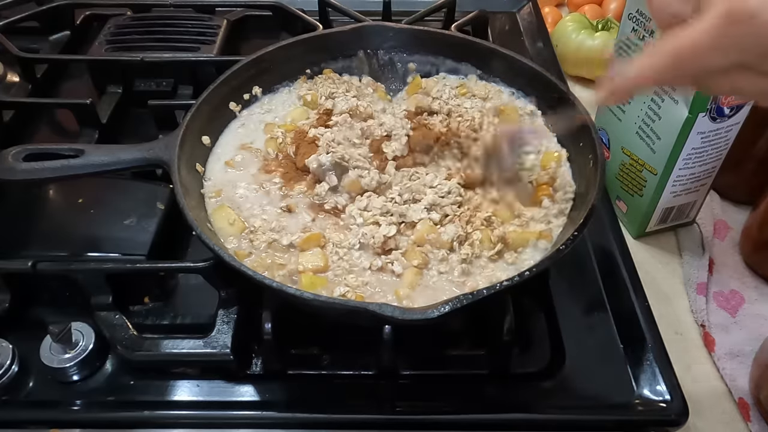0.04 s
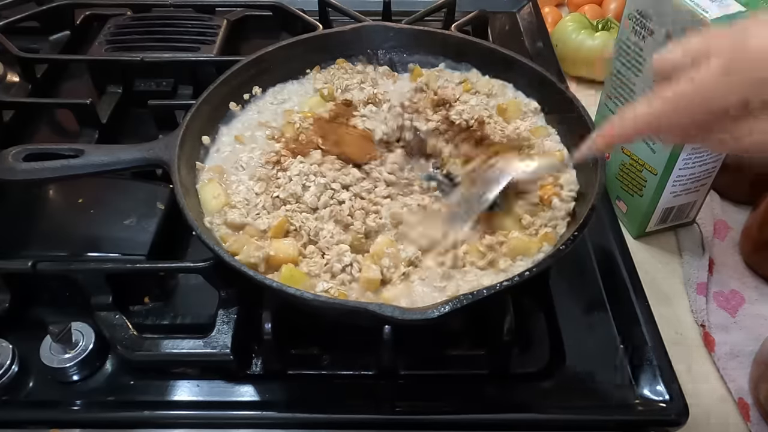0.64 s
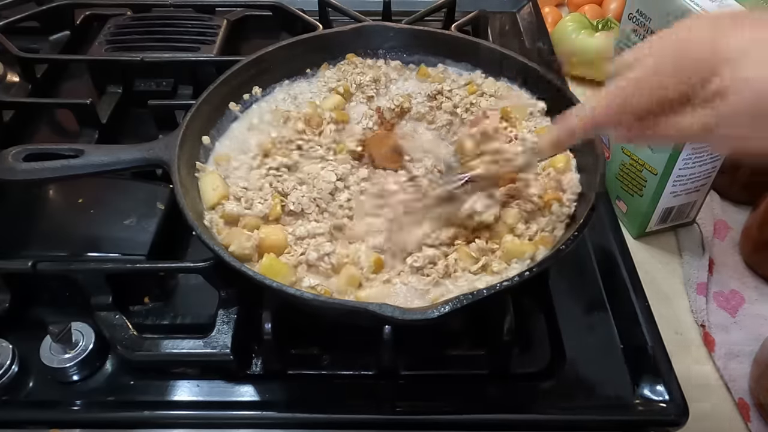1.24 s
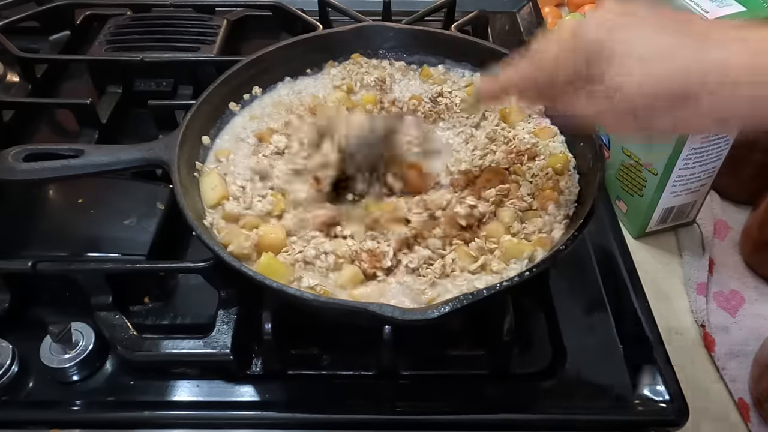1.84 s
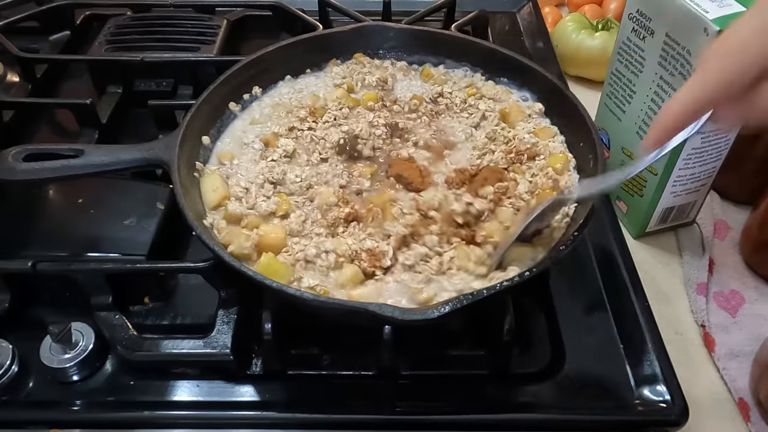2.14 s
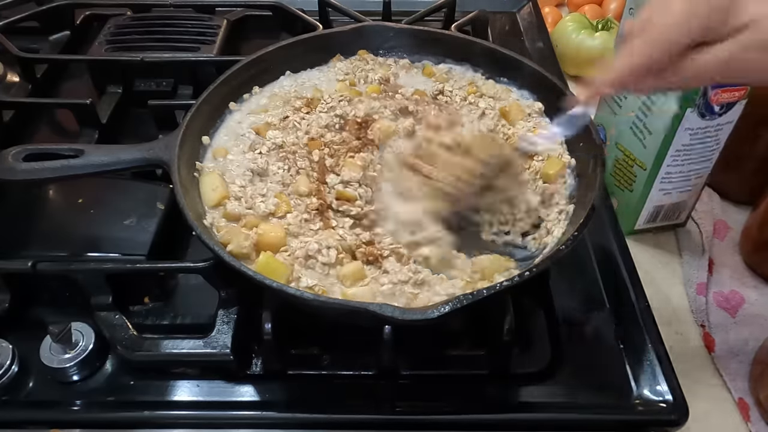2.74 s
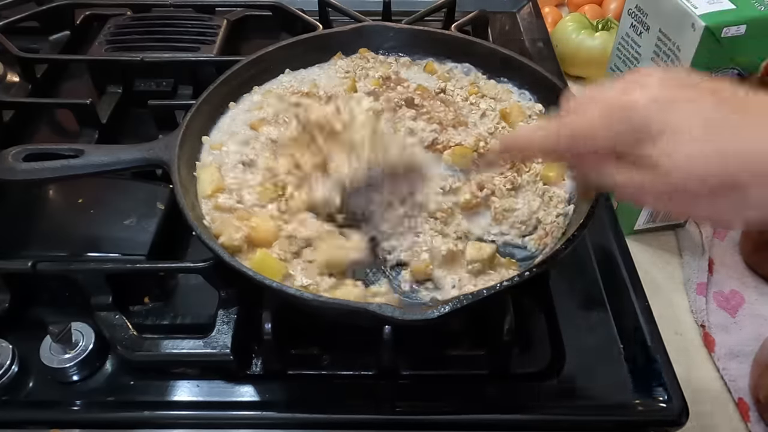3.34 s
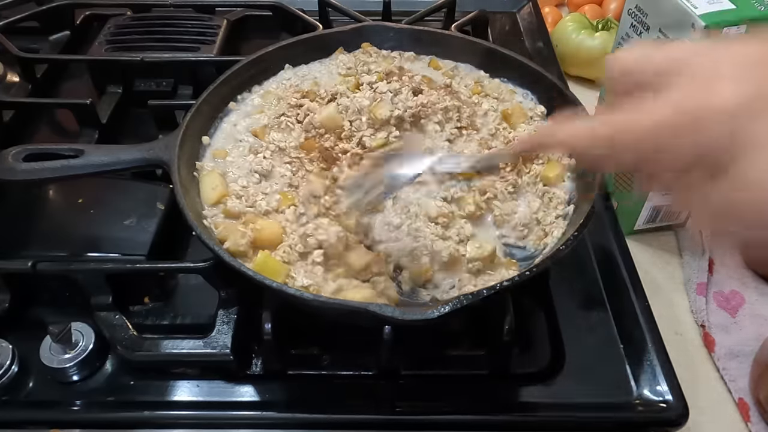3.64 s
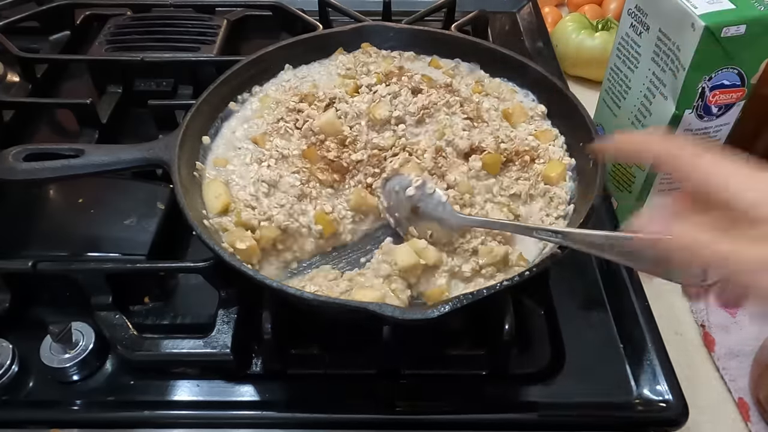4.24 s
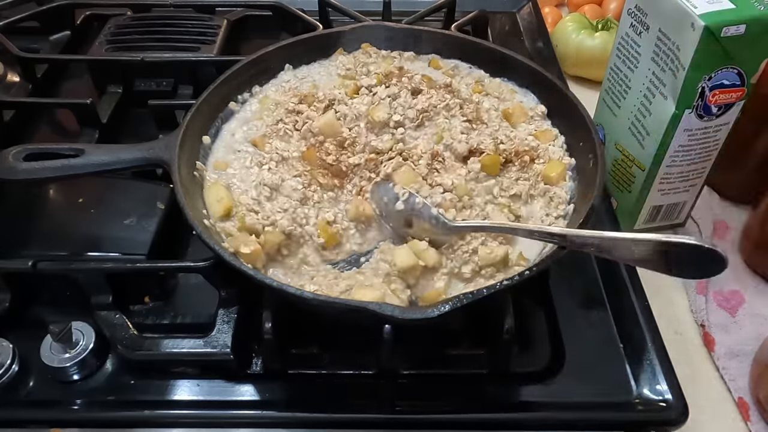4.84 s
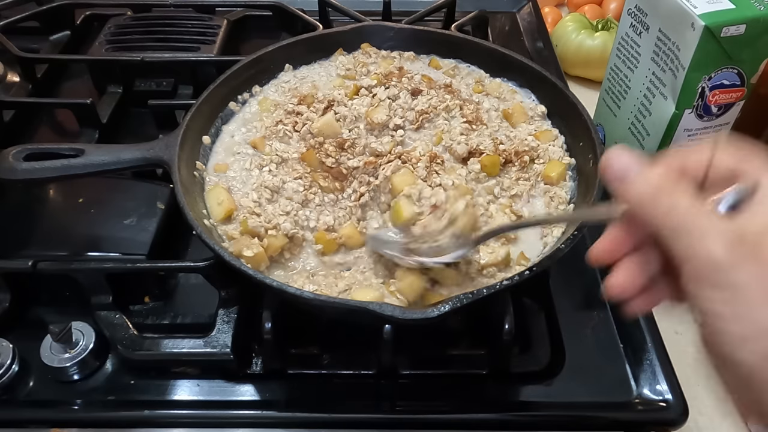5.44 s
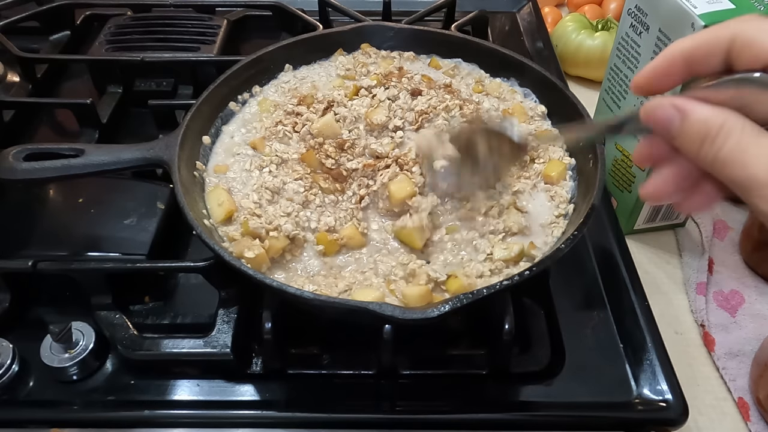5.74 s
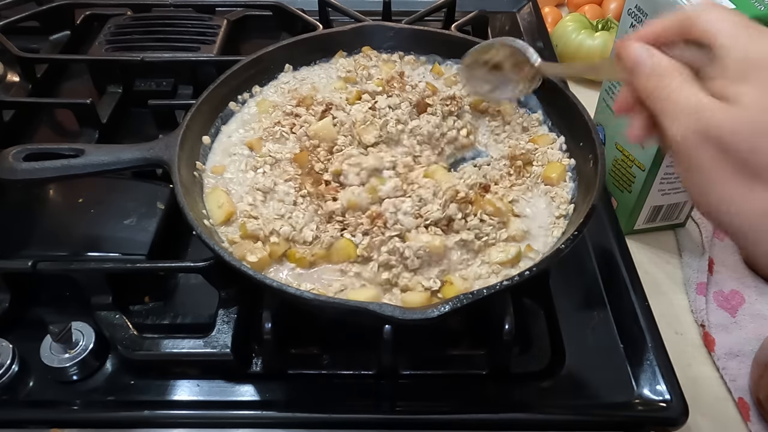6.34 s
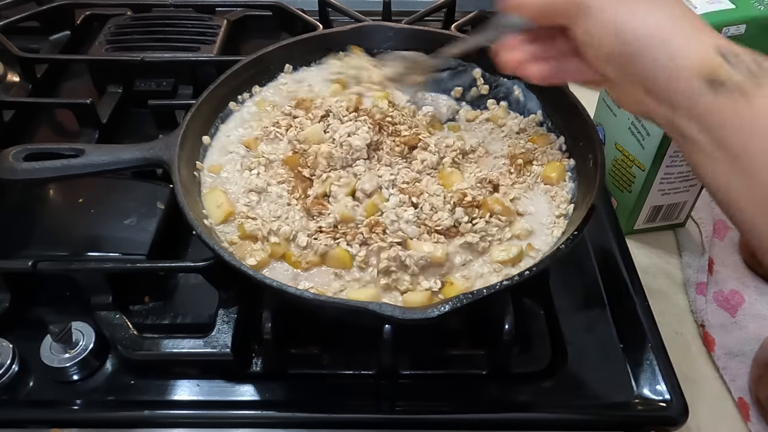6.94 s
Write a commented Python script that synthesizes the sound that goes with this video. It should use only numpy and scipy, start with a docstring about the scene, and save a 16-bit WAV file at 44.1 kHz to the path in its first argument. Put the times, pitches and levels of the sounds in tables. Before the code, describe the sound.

A steel spoon stirs thick oatmeal in a cast iron skillet, heard close in a small kitchen over a faint low rumble and hiss. From about 0.2 seconds, short gritty scrapes and damped clinks come roughly every half second, with soft wet squelches beneath and a sticky tick at 1.6 seconds. From about 1.9 seconds the pan also thuds dully on its grate. The loudest clink lands at 3.2 seconds and rings briefly. Around 4 seconds, sharp clinks run into a hard, chattering scrape, followed by a knock and a lighter tap near 4.3 seconds and a faint one at 4.6. Then only quiet bubbling and tiny pops remain. From about 5.8 seconds, soft squelches and wet ticks return, with a clear clink and short scrape at 6.6 seconds and a soft thud near 7 seconds.

```python
"""A steel spoon scrapes and clinks on a cast iron skillet as it stirs thick oatmeal in a small kitchen.
Stick-slip friction makes the rim grind, snag and chatter; impacts excite the modes of spoon and pan,
and the porridge damps them. The pan thuds on its grate. Wet oats squelch at each fold and tick as
films and bubbles burst. All is heard close by, in stereo, over a low rumble and a soft hiss."""
import sys
import numpy as np
from scipy import signal
from scipy.fft import rfft, irfft, next_fast_len
from scipy.io import wavfile
from scipy.ndimage import uniform_filter1d, map_coordinates

SR = 44100
rng = np.random.default_rng(int(sys.argv[2]) if len(sys.argv) > 2 else 0)


def to_wav(sig):
    """Store sig (one row per channel, or 1-D mono) as 16-bit WAV at the path in sys.argv[1].

    Samples outside -1..1 are clipped; the rate is SR.
    """
    pcm = np.clip(np.atleast_2d(sig), -1, 1) * 32767
    pcm = np.round(pcm).astype(np.int16)
    wavfile.write(sys.argv[1], SR, pcm.T)  # frames by channels


N = 308259


def amp(db):
    """Amplitude ratio of a level in decibels."""
    return 10 ** (np.asarray(db) / 20)

def unit(x):
    """Normalisation to rms 1."""
    return x / np.sqrt(np.mean(x ** 2) + 1e-20)

def along(points, hz):
    """Interpolation of (f/Hz, value) points on a logarithmic frequency axis."""
    f, values = np.transpose(points)
    return np.interp(np.log(hz + 1), np.log(f + 1), values)

def seconds(size):
    """Sample times, t/s."""
    return np.arange(size) / SR

def fade(t, t60):
    """Exponential decay, 60 dB in t60."""
    return np.exp(-np.log(1000) * t / t60)

def bell(x):
    """Gaussian curve of height 1."""
    return np.exp(-.5 * x ** 2)

def below(hz, edge_hz):
    """Gain of a steep low-pass filter."""
    return 1 / (1 + (hz / edge_hz) ** 8)

def add(track, start, sound):
    """Superposition of a sound on a track, from start in seconds."""
    part = track[round(start * SR):][:len(sound)]
    part += sound[:len(part)]

def filtered(x, response):
    """Linear filtering: the spectrum of x times a frequency response."""
    size = next_fast_len(x.shape[-1] + SR // 4)
    return irfft(rfft(x, size) * response(np.fft.rfftfreq(size, 1 / SR)), size)[..., :x.shape[-1]]

def coloured(x, spectrum, tilt_db=0, knee_hz=2500, size=2048):
    """Minimum-phase filtering to a spectrum, tilted by tilt_db per octave above the knee."""
    hz = np.fft.rfftfreq(size, 1 / SR)
    gain = amp(along(spectrum, hz) + tilt_db * np.log2(np.hypot(1, hz / knee_hz)))
    cepstrum = irfft(np.log(gain + 1e-6))
    causal = 2 * cepstrum[:size // 2] * (np.arange(size // 2) > 0)
    pulse = irfft(np.exp(rfft(causal, size)))
    return signal.fftconvolve(x, pulse)[:len(x)]

def impulses(rate, spread_db):
    """Poisson process: rate impulses a second, of random sign and log-normal size."""
    occurs = rng.random(N) < rate / SR
    return occurs * rng.choice([-1, 1], N) * amp(spread_db * rng.standard_normal(N))

def wobble(rate):
    """Smooth random modulation, rate knots a second."""
    return map_coordinates(rng.standard_normal(int(N * rate / SR) + 2), [seconds(N) * rate])

def pressure(start, swell, hold, release, touch_db=-6.5, touch_s=0.0072):
    """Normal force, 0 to 1: the spoon lands lightly, bears down, holds and lets go."""
    t = seconds(N) - start
    landing = np.clip(1 + t / touch_s, 0, 1)
    bearing = amp(touch_db * np.clip(1 - t / swell, 0, 1))
    return landing * bearing * fade(np.maximum(t - swell - hold, 0), release)


# Spectral densities of the ambient rumble and hiss: f/Hz, level/dB
RUMBLE_SPECTRUM = [(22, -7.5), (65, -8.5), (85, -17), (102, -8.5), (167, -0.5), (248, -0.5), (350, -14.5),
                   (413, -11), (445, -13), (800, -22.5), (1150, -110)]
HISS_SPECTRUM = [(410, 2), (961, 2.5), (1300, 8.5), (1860, -5), (2860, -4), (4350, -19), (5320, -27.5),
                 (7040, -23.5), (12100, -47), (14500, -64)]
def background(rumble_db=-56.5, hiss_db=-61.5):
    """Stationary noise: a rumble nearly coherent between the channels, and a wider hiss."""
    def noise(spectrum, width):
        mid, side = filtered(rng.standard_normal((2, N)), lambda hz: amp(along(spectrum, hz)))
        return unit(np.array([mid + width * side, mid - width * side]))
    rumble = amp(rumble_db) * noise(RUMBLE_SPECTRUM, width=0.12)
    return rumble + amp(hiss_db) * noise(HISS_SPECTRUM, width=0.56)

# Reverberation time of the kitchen: f/Hz, T60/s
REVERB_TIMES = [(120, 0.38), (400, 0.46), (1500, 0.26), (4000, 0.15), (12000, 0.11)]
def reverberation(x, coherent_below_hz=520, build_s=0.0024):
    """Diffuse field: an exponential tail whose two channels are alike only in the bass."""
    hz, t, noise = signal.stft(rng.standard_normal((2, SR // 2)), SR, nperseg=256)
    mid, side = noise * fade(t, along(REVERB_TIMES, hz)[:, None]) * (1 - np.exp(-t / build_s))
    side = side * (hz ** 2 / (hz ** 2 + coherent_below_hz ** 2))[:, None]
    tail = signal.istft(np.array([mid + side, mid - side]), SR, nperseg=256)[1]
    return signal.fftconvolve(x[None], tail / np.linalg.norm(tail[0]), axes=1)[:, :N]

# Folds of the oats, clear of the iron: centre t/s, half-width/s, crackle/dB, mush/dB, froth/dB
OAT_FOLDS = [(0.037, 0.087, -64, -57, -72), (0.696, 0.17, -63, -64, -75.5),
             (1.554, 0.14, -65, -59.5, -69.5), (2.562, 0.13, -82, -63, -71.5),
             (3.519, 0.45, -69.5, -81, -69), (4.693, 0.57, -66.5, -65, -69),
             (5.78, 0.16, -71, -65.5, -72.5), (6.06, 0.038, -65, -57, -80), (6.254, 0.046, -68, -53, -92),
             (6.38, 0.12, -73, -62, -64.5), (6.593, 0.02, -65, -49, -85), (6.98, 0.021, -68, -52.5, -76)]
# Spectral density of sliding porridge: f/Hz, level/dB
MUSH_SPECTRUM = [(120, 9), (300, 28.5), (600, -2), (1300, 16), (2800, 8), (4100, 7), (5200, -18),
                 (7000, -20), (13000, -24)]
def mush():
    """Viscous shear: porridge slides over the spoon's bowl, a dense, soft smear at each fold."""
    t = seconds(N)
    slide = sum(amp(db) * bell((t - centre) / half) for centre, half, _, db, _ in OAT_FOLDS)
    return slide * unit(coloured(impulses(rate=5000, spread_db=3), MUSH_SPECTRUM))

# Spectral density of milk froth: f/Hz, level/dB
FROTH_SPECTRUM = [(2000, -55), (5000, -12.5), (7000, 4.5), (8500, -4.5), (10500, -3.5), (14000, -18)]
def froth(squeezed_db=-63):
    """Shot noise of fine bubbles: the milk sizzles under each stroke and at each fold."""
    t = seconds(N)
    push = np.max([pressure(*stroke[:4]) for stroke in SPOON_STROKES], axis=0)
    folds = sum(amp(db) * bell((t - centre) / half) for centre, half, _, _, db in OAT_FOLDS)
    sizzle = unit(coloured(impulses(rate=4000, spread_db=4), FROTH_SPECTRUM))
    return (amp(squeezed_db) * np.sqrt(push) + folds) * sizzle

# Spectral density of wet crackle: f/Hz, level/dB
CRACKLE_SPECTRUM = [(500, 0.5), (1400, 5), (3000, 2.5), (4200, 1), (5200, -13.5), (7000, -2.5),
                    (11000, -15), (14000, -24)]
def crackle(simmer_db=-65, clump_db=2):
    """Incoherent sources add in power: tiny bubbles burst in a low simmer that swells at each fold."""
    t = seconds(N)
    bursts = np.tanh(impulses(rate=700, spread_db=1.5) / 10)  # bubble size is limited
    fold_power = sum(amp(db) ** 2 * np.exp(-((t - centre) / half) ** 2)
                     for centre, half, db, _, _ in OAT_FOLDS)
    strength = np.sqrt(amp(simmer_db) ** 2 + fold_power) * amp(clump_db * wobble(rate=14))
    return strength * unit(coloured(bursts, CRACKLE_SPECTRUM))

# The loudest wet ticks: t/s, level/dB, f/Hz
WET_TICKS = [(1.595, -30, 2900), (5.958, -43, 3200), (5.9826, -40.5, 4280), (6.185, -40, 3200),
             (6.3313, -38, 4500), (6.511, -37, 4670), (6.876, -42, 6350), (6.9537, -37.5, 3870)]
def ticks(pop_count=45, pop_db=-47, pop_hz=6500, t60=0.026, gain_db=-9):
    """Film rupture: sticky milk tears in short noise bursts, loud ticks among faint random pops."""
    out, t = np.zeros(N), seconds(SR // 25)
    pop_times = rng.random(pop_count) * N / SR
    pops = [(start, pop_db + 3 * np.tanh(size), pop_hz * 2 ** (0.62 * height))
            for start, (size, height) in zip(pop_times, rng.standard_normal((pop_count, 2)))]
    for start, db, pitch in WET_TICKS + pops:
        band = lambda hz: amp(along(CRACKLE_SPECTRUM, hz)) * bell(np.log2((hz + 1) / pitch))
        smack = unit(filtered(rng.standard_normal(len(t)), band))
        add(out, start, amp(db + gain_db) * smack * fade(t, t60))
    return out

# Normal modes of the skillet on its grate: f/Hz, level/dB, T60/s
PAN_MODES = [(139.7, 4, 0.27), (246.4, -16, 0.44), (330, 5, 0.15), (460, 1.5, 0.16), (612.5, 1, 0.23),
             (752.5, -3, 0.18), (950, -3.5, 0.37), (1239, 3, 0.21), (1390, -8, 0.16), (1790, -5, 0.22),
             (1994, -15.5, 0.066), (2870, -8, 0.18), (3140, -7.5, 0.38), (3610, 1, 0.12),
             (4340, -13.5, 0.34), (7670, -34, 0.068)]
def pan_ring(weight, vary_db=4.0, detune=0.0123, smear_hz=9):
    """Modal superposition: one blow excites each damped mode of the pan by weight(f)."""
    t = seconds(SR // 2)
    hz, db, t60 = np.transpose(PAN_MODES)[:, :, None]
    # the shifting load of porridge detunes each mode and blurs its pitch
    hz = hz * np.exp(detune * rng.standard_normal(hz.shape))
    drift_step = np.sqrt(smear_hz * hz / hz.mean() / (2 * np.pi * SR))
    drift = drift_step * np.cumsum(rng.standard_normal((len(hz), len(t))), axis=1)
    gain = amp(db + vary_db * rng.standard_normal(hz.shape)) * weight(hz)
    cycles = hz * t + drift + rng.random(hz.shape)
    return np.sum(gain * np.sin(2 * np.pi * cycles) * fade(t, t60), axis=0)

# Dull blows of the pan on its grate and of dropped oats: t/s, level/dB, centre f/Hz
SOFT_BLOWS = [(1.37, -42, 228), (1.862, -32, 324), (2.316, -42.5, 400), (2.372, -27.5, 360),
              (2.402, -31.5, 125), (2.712, -32, 175), (2.713, -39, 740), (2.822, -33.5, 380),
              (2.822, -36.5, 576), (3.225, -31.5, 173), (3.232, -28, 312), (3.262, -28, 123),
              (3.919, -39, 483), (4.246, -31, 372), (4.249, -32.5, 159), (6.241, -49, 292),
              (6.291, -46, 227), (6.624, -41.5, 164), (6.631, -36.5, 360), (6.956, -39, 198)]
def thuds(octaves=0.4, rise_s=0.0045, lowest_hz=110, gain_db=-13.5, rock_db=-5, rock_cycles=14,
          rattle_db=-1.5, rattle_t60=0.36, stove_hz=62, stove_db=-9, stove_t60=0.53):
    """Soft impacts excite only low modes; the deeper the blow, the more it shakes the stove top."""
    out, t = np.zeros(N), seconds(SR // 2)
    high_pass = signal.butter(2, lowest_hz, "high", fs=SR, output="sos")
    onset = 1 - np.exp(-t / rise_s)
    for start, db, centre in SOFT_BLOWS:
        band = lambda hz: bell(np.log2((hz + 1) / centre) / octaves) * (1 - below(hz, lowest_hz))
        depth = lowest_hz / centre
        rattle = unit(filtered(rng.standard_normal(len(t)), band) * fade(t, rattle_t60 * depth ** .5))
        stove = unit(np.sin(2 * np.pi * stove_hz * t) * fade(t, stove_t60)) * depth ** 2
        # the pan rocks on the grate at a pitch set by where it is pushed
        rock = unit(np.sin(2 * np.pi * centre * t) * fade(t, rock_cycles / centre))
        blow = (unit(pan_ring(band)) + amp(rock_db) * rock + amp(rattle_db) * rattle) * onset
        add(out, start, amp(db + gain_db) * (signal.sosfilt(high_pass, blow) + amp(stove_db) * stove))
    return out

# Normal modes of the spoon's steel bowl: f/Hz, level/dB
SPOON_MODES = [(1210, 4), (1500, -1), (1900, 5.5), (2330, 1.5), (2920, 7.5), (4150, 4.5)]
def spoon_ring(contact_hz=2100, t60=0.008, octaves=0.38, vary_db=7.0, band_hz=(950, 4900)):
    """Damped vibration of the bowl, peak 1: modes near the contact frequency respond the most."""
    t = seconds(SR // 8)
    hz, db = np.transpose(SPOON_MODES)[:, :, None]
    distance = np.log2(hz / contact_hz) / octaves
    gain = amp(db + vary_db * rng.standard_normal(hz.shape)) / (1 + distance ** 2)
    ring = np.sum(gain * np.sin(2 * np.pi * hz * t), axis=0) * fade(t, t60)
    ring = signal.sosfilt(signal.butter(3, band_hz, "band", fs=SR, output="sos"), ring)
    return ring / np.abs(ring).max()

# The spoon left free after the hardest blow: t/s, initial level/dB, f/Hz, T60/s
FREE_RINGS = [(3.224, -43, 3070, 0.58)]
def singing(relative_width=0.09):
    """Free vibration: the spoon sings on in a narrow, blurred band that outlasts the blow."""
    out, t = np.zeros(N), seconds(SR // 2)
    for start, db, hz, t60 in FREE_RINGS:
        ring = unit(filtered(rng.standard_normal(len(t)), lambda f: below(f - hz, relative_width * hz)))
        add(out, start, amp(db) * ring * fade(t, t60))
    return out

# Spectral density of a bare contact: f/Hz, level/dB
CONTACT_SPECTRUM = [(60, -73), (130, -12), (300, -31), (700, -49), (1200, -13), (2700, 3.5), (4200, -2.5),
                    (5200, -8), (6800, 0.5), (9500, -15.5), (14000, -45)]
# The spoon lands on iron: t/s, level/dB, contact f/Hz, hardness/(dB/octave), pan ring/dB, spoon T60/s
SPOON_IMPACTS = [(0.192, -14.5, 1770, -39, -26.5, 0.016), (1.0853, -12, 1660, -17, -28, 0.011),
                 (1.4874, -18.5, 1310, -13.5, -25.5, 0.021), (1.5618, -32.5, 1600, -40, -38, 0.017),
                 (1.8603, -16, 1770, -34, -31, 0.015), (2.3139, -17.5, 2100, -22, -36, 0.012),
                 (2.7118, -13.5, 1990, -2.5, -25.5, 0.029), (2.8011, -19.5, 2330, -10.5, -36, 0.028),
                 (3.2251, -2, 2950, -2.5, -36, .019), (3.241, -16.5, 2630, -7, -26, 0.0093),
                 (3.917, -28.5, 1210, 8, -31, 0.016), (3.975, -9, 2440, 0, -23, 0.01),
                 (3.985, -11.5, 3870, -7, -30, 0.024), (4.247, -13.5, 1420, -0.5, -22.5, 0.036),
                 (4.313, -20.5, 1350, -22, -32.5, 0.044), (4.608, -33, 1350, 2.5, -19, 0.038),
                 (6.372, -36, 1240, -59, -32, 0.033), (6.6208, -9, 1700, -8.5, -32, 0.012)]
def clinks(tap_db=-8, bowl_db=-2, crack_db=-10, crack_t60=0.04, shimmer_db=-34, shimmer_t60=0.56,
           shimmer_per_hardness=0.61, ring_octaves=2.83, radiation_hz=400):
    """Hard impact: a tap rings the spoon until porridge damps it; the iron rings faintly on."""
    out, t = np.zeros(N), seconds(SR // 2)
    for start, db, hz, hardness, ring_db, spoon_t60 in SPOON_IMPACTS:
        tap = coloured(1. * (t == 0), CONTACT_SPECTRUM, hardness)
        tap /= np.abs(tap).max()
        # most of the crowded modes die at once; the barer the contact, the more shimmer stays
        crowd = unit(coloured(rng.standard_normal(len(t)), CONTACT_SPECTRUM, hardness))
        crack = amp(crack_db) * fade(t, crack_t60) / 2
        shimmer = amp(shimmer_db + shimmer_per_hardness * hardness) * fade(t, shimmer_t60)
        iron = amp(ring_db) * pan_ring(lambda f: 1 / (1 + (np.log2(f / hz) / ring_octaves) ** 2))
        add(out, start, amp(db) * (amp(tap_db) * tap + crowd * (crack + shimmer) + iron))
        add(out, start, amp(db + bowl_db) * spoon_ring(hz, spoon_t60))
    # the light spoon radiates little bass
    return filtered(out, lambda f: 1j * f / (1j * f + radiation_hz))

# The rim catches on rough spots: t/s, peak level/dB
RIM_SNAGS = [(0.260, -20), (0.360, -16), (0.4325, -23), (0.453, -23.5), (0.468, -19), (1.004, -20),
             (1.378, -35), (3.2146, -26), (4.019, -17), (4.068, -16), (4.084, -15), (6.662, -24.5)]
def snags():
    """Impulse excitation: each time the rim jumps free, the bowl gives one short, gritty ring."""
    out = np.zeros(N)
    for start, db in RIM_SNAGS:
        add(out, start, amp(db) * spoon_ring())
    return out

# Hard pushes on bare iron: t/s, swell/s, hold/s, release T60/s, level/dB
HARD_PUSHES = [(3.966, 0.016, .016, 0.057, -22), (4.015, 0.0066, 0.013, 0.33, -27)]
# Resonances of spoon and pan in contact: f/Hz, bandwidth/Hz, level/dB
CONTACT_MODES = [(224, 28, -15), (464, 41, 10.5), (574, 27, 11.5), (920, 21, 16), (989, 31, 12.5),
                 (1300, 29, 14.5), (2410, 42, 9.5), (2860, 73, 8.5), (3660, 62, 11.5), (4190, 130, 0.5)]
def chatter(top_hz=7500):
    """Forced resonance: coarse slips, undamped by porridge, drive spoon and pan together."""
    def response(f):
        modes = sum((-1) ** k * amp(db) * 1j * f * width / (hz ** 2 - f ** 2 + 1j * f * width)
                    for k, (hz, width, db) in enumerate(CONTACT_MODES))
        return modes * below(f, top_hz)
    push = sum(amp(db) * pressure(*shape) for *shape, db in HARD_PUSHES)
    return push * unit(filtered(impulses(rate=600, spread_db=3), response))

# Spectral density of steel grinding on iron: f/Hz, level/dB
GRIND_SPECTRUM = [(40, -51), (100, -27.5), (145, -12), (190, -15), (240, -2.5), (335, -5.5), (410, -16.5),
                  (480, -9), (750, -9.5), (950, -1.5), (1280, 5.5), (1800, -1), (2600, -4), (4100, -0.5),
                  (5200, -18.5), (6800, -23.5), (13000, -57)]
def stick_slip(grain_db=1.8, ring_db=-12, grit_db=-5):
    """Stick-slip friction: fine slips rasp and ring the pan; coarser catches ring the bowl."""
    # oats under the rim bunch the slips into uneven grains
    slips = impulses(rate=3800, spread_db=2.5) * amp(grain_db * wobble(rate=320))
    iron = unit(signal.fftconvolve(slips, pan_ring(lambda hz: 1))[:N])
    rasp = unit(coloured(unit(slips) + amp(ring_db) * iron / 2, GRIND_SPECTRUM))
    grit = unit(signal.fftconvolve(impulses(rate=420, spread_db=1), spoon_ring())[:N])
    return rasp + amp(grit_db) * grit

def moving_contact(rasp, bowl_db=7, bowl_octaves=0.49, roam_db=2.8, waver_hz=150):
    """Resonance gliding with the contact point: the rasp shaped by it, and a squeal at its pitch."""
    hz, times, spectrum = signal.stft(rasp, SR, nperseg=512)
    bowl_hz = np.full(len(times), float(SPOON_STROKES[0][-2]))
    for start, swell, hold, *_, pitch, glide in SPOON_STROKES:
        octaves = glide * np.clip(times - start - swell, -swell, hold)
        bowl_hz = np.where(times >= start, pitch * 2 ** octaves, bowl_hz)
    lift = bell(np.log2((hz[:, None] + 1) / bowl_hz) / bowl_octaves)
    # as the contact travels, the iron's crowded resonances swell and fade in turn
    roam = uniform_filter1d(rng.standard_normal(spectrum.shape), size=2, axis=0)
    roam = unit(uniform_filter1d(roam, size=10, axis=1))
    shaped = signal.istft(spectrum * amp(bowl_db * lift + roam_db * roam), SR, nperseg=512)[1][:N]
    waver = filtered(rng.standard_normal(N), lambda f: below(f, waver_hz))
    cycles = np.cumsum(np.interp(seconds(N), times, bowl_hz)) / SR
    return shaped, unit(waver * np.sin(2 * np.pi * cycles))

# Strokes along the iron: t/s, swell/s, hold/s, release T60/s, level/dB,
# relative drag/dB, relative edge/dB, bowl f/Hz, glide/(octaves/s)
SPOON_STROKES = [(0.194, 0.16, 0.051, 0.31, -30, -7.5, -19.5, 1847, 2),
                 (0.294, 0.0247, 0.022, 0.16, -40, -30, -3.5, 1955, -1),
                 (0.428, 0.022, 0.052, 0.32, -32.5, -14, -18, 1800, 11),
                 (0.887, 0.016, 0.11, 0.13, -29.5, -10.5, -18.5, 1820, 5),
                 (1.087, 0.023, 0.03, 0.11, -32, -11.5, -14, 1745, 0),
                 (1.408, 0.014, 0.032, 0.2, -27.5, -11.5, -18, 1838, -1.5),
                 (1.861, 0.0013, 0.01, 0.11, -29.5, 0, -14, 2255, -3.5),
                 (1.887, 0.019, 0.023, 0.14, -28.5, -4, -9.5, 1603, -3),
                 (2.313, 0.0086, 0.031, 0.054, -36.5, -4.5, -15, 2120, 1.5),
                 (2.356, 0.0084, 0.022, 0.15, -30.5, -2.5, -13, 1673, -14.5),
                 (2.802, 0.0054, 0.004, 0.2, -37, 5.5, -3.5, 1620, 1),
                 (3.919, 0.0037, 0.11, 0.054, -43, 8, 3, 1480, -10.5),
                 (4.03, 0.0194, 0.035, 0.18, -26.5, -11, -5, 1706, 5.5),
                 (4.317, 0.00077, 0.0062, 0.11, -40, 4, -8, 1400, 17),
                 (6.624, 0.0023, 0.026, 0.12, -36.5, -15, -1.5, 1360, -3)]
def scraping(drag_db=-2, grind_db=-1, edge_db=-1, fizz_db=-8, squeal_db=-28,
             brightening=0.031, fizz_growth=1.03, borders_hz=(1, 850, 2800, 5200, SR)):
    """Friction noise grows with normal force; drag adds body and a bare edge adds brightness."""
    rasp, squeal = moving_contact(stick_slip())
    drag, grind, edge, fizz = (unit(filtered(rasp, lambda hz: below(hz, hi) * (1 - below(hz, lo)) ** 2))
                               for lo, hi in zip(borders_hz, borders_hz[1:]))
    out = np.zeros(N)
    for start, swell, hold, release, db, body_db, bare_db, _, glide in SPOON_STROKES:
        push = pressure(start, swell, hold, release)
        on = push > 1e-3
        bright_db = bare_db + brightening * 20 * np.log10(push[on])
        stroke = amp(grind_db) * grind[on] + amp(body_db + drag_db) * drag[on]
        stroke += amp(bright_db + edge_db) * edge[on]
        stroke += amp(fizz_growth * np.minimum(bright_db, 0) + fizz_db) * fizz[on]
        # steel squeals near full pressure, the more the faster its pitch glides
        stroke += amp(squeal_db) * abs(glide) * push[on] ** 3 * squeal[on]
        out[on] += amp(db) * push[on] * stroke
    return out

# Left channel relative to right: f/Hz, level/dB
LEVEL_DIFFERENCE = [(250, 0), (1300, -0.5), (2600, -1.5), (4500, -0.5), (13000, 2)]
# Lead of the left channel: f/Hz, phase/rad
PHASE_DIFFERENCE = [(250, 0.12), (700, -0.21), (3400, -0.5), (13000, -0.64)]
def direct_sound(x):
    """Path difference: the pan stands slightly to the right, so the left side lags above the bass."""
    sides = np.array([[.5], [-.5]])
    gain = lambda hz: amp(sides * along(LEVEL_DIFFERENCE, hz))
    return filtered(x, lambda hz: gain(hz) * np.exp(1j * sides * along(PHASE_DIFFERENCE, hz)))

def scene(room_db=-11):
    """Superposition of the pan's direct sound, its reverberant field and the ambient noise."""
    pan = scraping() + snags() + chatter() + clinks() + singing() + thuds()
    pan += crackle() + ticks() + mush() + froth()
    return direct_sound(pan) + amp(room_db) * reverberation(pan) + background()

def record(dry, top_hz=14300):
    """Band limiting: an ideal low-pass removes everything above top_hz."""
    return filtered(dry, lambda hz: hz < top_hz)


dry = scene()
out = record(dry)
to_wav(out)
```